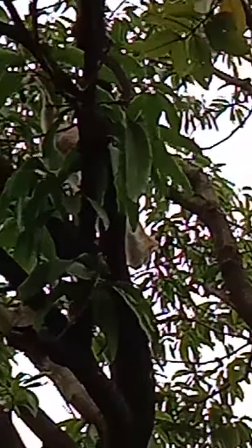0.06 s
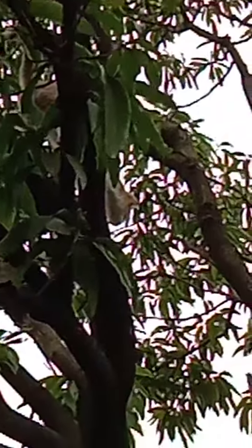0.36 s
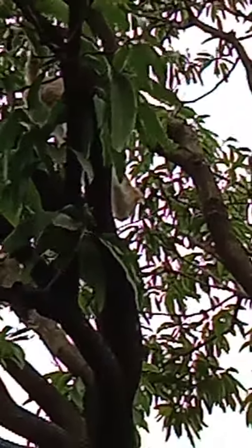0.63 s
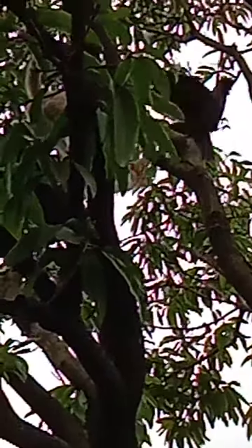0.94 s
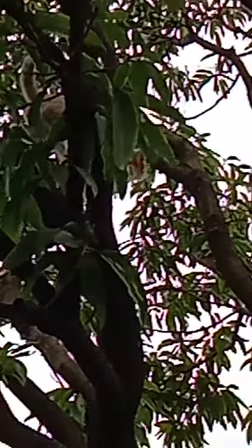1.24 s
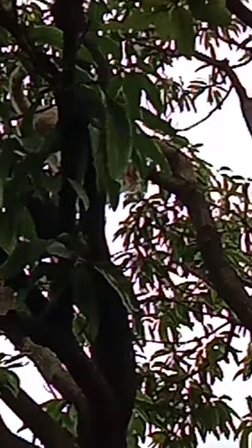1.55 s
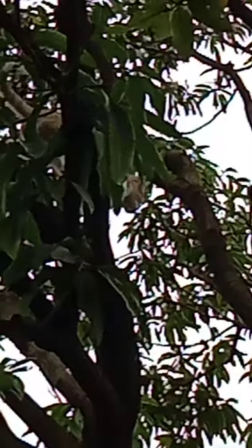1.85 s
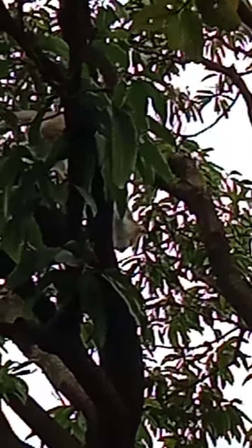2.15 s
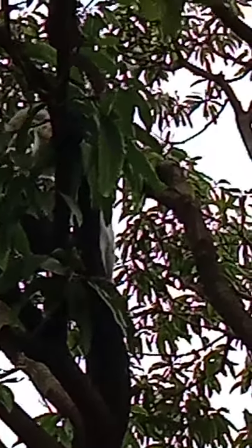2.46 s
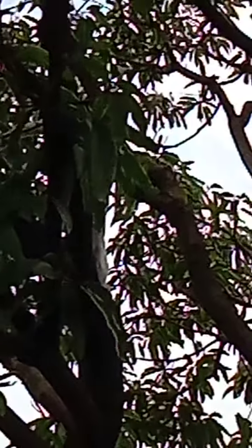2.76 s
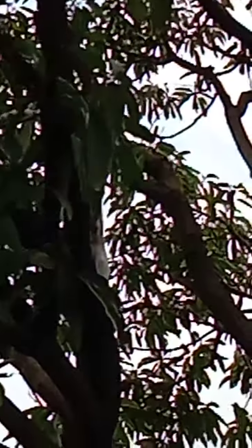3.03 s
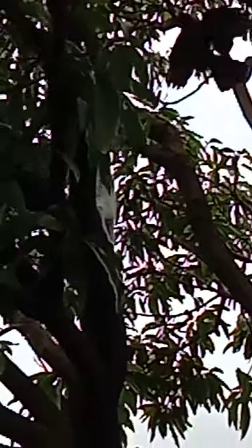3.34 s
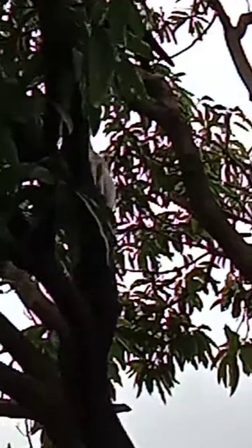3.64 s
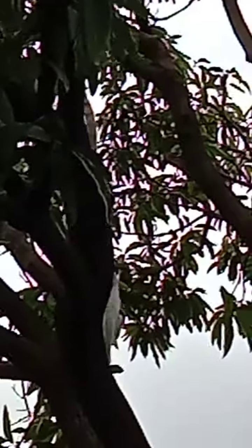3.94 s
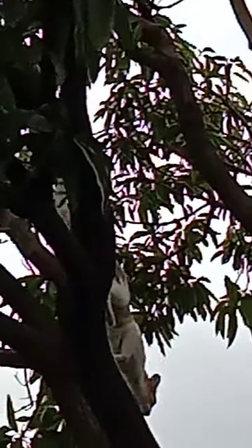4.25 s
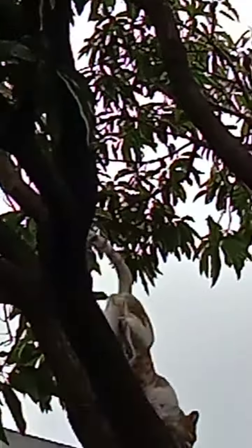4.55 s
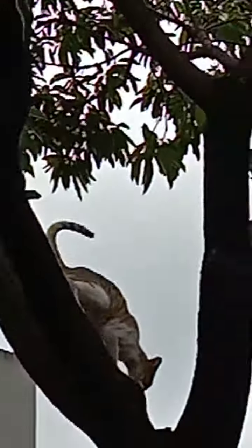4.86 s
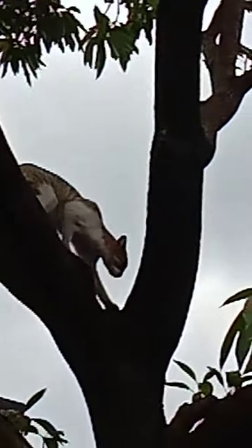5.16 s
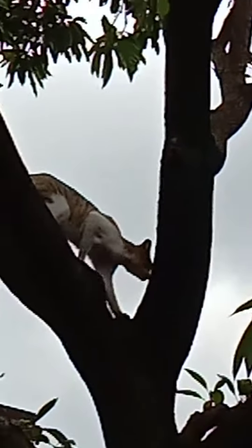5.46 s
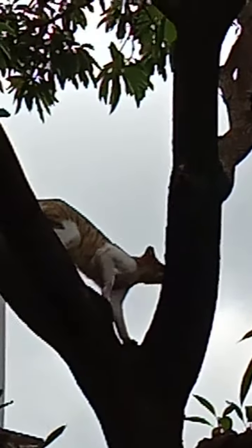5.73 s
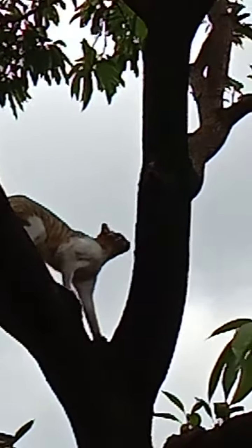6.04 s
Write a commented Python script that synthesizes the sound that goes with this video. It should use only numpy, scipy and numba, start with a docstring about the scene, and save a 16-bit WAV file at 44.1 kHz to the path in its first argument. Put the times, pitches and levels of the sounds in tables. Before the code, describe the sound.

Crows caw harshly outdoors, joined halfway by another crow's rasping screeches, over low rumbles and bumps of microphone handling.

```python
"""Crows scolding a cat

Crows mob a silent cat in a leafy tree: eight harsh caws, joined halfway by another crow's rasping.
Each voice is a train of tiny air pulses from the bird's voice box, shaped by its throat and beak.
Fainter birds call further off, and leaves, trunks and house walls scatter every call.
A hand on the phone rumbles and bumps over soft outdoor air; the sound is mono."""
import sys
import numpy as np
from scipy import signal
from scipy.fft import rfft, irfft, next_fast_len
from scipy.io import wavfile
from scipy.ndimage import uniform_filter1d
from numba import njit

SR = 44100
rng = np.random.default_rng(int(sys.argv[2]) if len(sys.argv) > 2 else 0)


def waveform_to_disk(signal):
    """Save audio, clipped to [-1, 1], as 16-bit WAV at the path in sys.argv[1]."""
    frames = np.transpose(np.atleast_2d(signal))
    scaled = np.clip(frames, -1, 1) * 32767
    samples = np.round(scaled).astype(np.int16)
    wavfile.write(sys.argv[1], SR, samples)


N = 273420
T = np.arange(N) / SR

# Levels in the tables are relative: the functions add their own gains.
# The main caws: start_s, swell_s, fade_s, top_pitch_hz, throat_hz, roughness (0 to 1),
# crow (0 or 1), level_db, open_beak_hz, beak_gain
NEAR_CAWS = [(0.695, 0.41, 0.13, 477.4, 960, 0.48, 0, -21, 2130, 3.2),
             (1.335, 0.28, 0.12, 466.5, 966, 0.43, 0, -19.5, 2004, 2.94),
             (1.915, .14, .16, 489, 986, 0.4, 0, -23.5, 1790, 2.07),
             (3.30, .33, 0.16, 486.7, 893, 0.37, 0, -23, 2030, 3.4),
             (3.73, .15, 0.21, 493.5, 952, 0.41, 0, -24, 2000, 1.3),
             (4.06, .15, .14, 562.7, 1160, 0.23, 1, -20.5, 2270, 4.2),
             (4.55, .13, .155, 530.3, 1064, 0.47, 1, -18, 1890, 1.5),
             (5.10, .15, .15, 499.2, 1020, 0.34, 1, -19, 1830, 3.8)]
# The throat tone of the two cawing crows, one list each: frequency_hz, level_db
CAW_TONES = [
    [(560, -35), (820, -10), (1150, -6), (1500, -1), (2050, -2.5), (2800, -16), (3850, -25.5), (4500, -9.5),
     (5600, -1), (7000, -10.5), (8600, -12.5), (10000, -18), (15500, -22.5)],
    [(600, -28.5), (850, -7.5), (1050, -4.5), (1270, -5), (1550, 0), (2100, 0), (2750, -11), (3500, 5.5),
     (4100, -11.5), (5700, -0.5), (7000, -7.5), (10000, -17.5), (15500, -16)],
]
# The rasping crow's screeches: start_s, swell_s, fade_s, level_db, throat_hz,
# sag (share of throat_hz lost by the end), treble_db, low_db
SCREECHES = [(3.08, 0.07, 0.12, -46, 2860, .05, 6.5, 3), (3.195, 0.38, 0.23, -24.5, 3490, 0.17, 2, 5.5),
             (3.73, 0.28, 0.11, -28, 3240, .1, 4.5, 12), (4.02, 0.15, 0.14, -23.5, 3600, 0.37, 4.5, -3),
             (4.31, 0.19, 0.15, -25, 3530, .25, 4, 4), (4.52, 0.091, .16, -28.5, 3350, 0, 2, 9),
             (4.70, 0.16, .12, -22, 3500, 0.12, 2, 3.5), (4.93, 0.1, 0.088, -23, 3500, 0.26, 2.5, -2),
             (5.16, 0.21, .17, -21.5, 3530, 0.38, -1, 0), (5.53, 0.24, 0.12, -23.5, 3650, 0.46, 1.5, -1),
             (5.829, 0.23, .15, -20, 3570, 0.23, 0, -4.5)]
# The throat tone of the rasping crow: frequency_hz, level_db
SCREECH_TONE = [(600, -40.5), (1200, -24.5), (1700, -14.5), (2150, -12.5), (2600, -5.5), (2950, -6.5),
                (3500, -8.5), (4250, -9.5), (5100, -7.5), (5900, -2), (6800, -12.5), (8200, -11),
                (9200, -18.5), (14500, -22)]
# Hoarse calls from other trees: start_s, length_s, throat_hz, filter_width_hz, level_db
DISTANT_CAWS = [(0.018, 0.22, 2840, 1800, -54.5), (.23, 0.15, 3330, 130, -49), (.33, 0.12, 1510, 320, -43),
                (0.38, 0.2, 3200, 130, -47.5), (0.21, 0.41, 2700, 500, -52), (1.63, 0.21, 3270, 440, -51),
                (2.5, 0.4, 2325, 57, -46.5), (1.4, 0.223, 1800, 1100, -55), (2.48, 0.15, 880, 72, -56),
                (2.48, 0.24, 2750, 530, -45.5), (2.38, 0.37, 1420, 460, -48.5),
                (3.02, 0.233, 1540, 410, -48.5)]
# The path of one far, clear call: time_s, pitch_hz, level_db
CLEAR_CALL = [(2.71, 456, -50), (2.8, 472.6, -44.5), (2.9, 488.6, -51), (3.0, 497.6, -50), (3.08, 483, -45),
              (3.14, 476, -50.5), (3.22, 476, -39)]
# The overtones of that call: pitch_multiple, level_db
CLEAR_OVERTONES = [(2, -4), (3, -18.5), (4, 3), (5, -5), (6, 6), (7, -7)]
# Soft, far hoots: start_s, length_s, top_pitch_hz, level_db
DISTANT_HOOTS = [(0.115, 0.13, 377, -49.5), (1.465, 0.18, 342, -45), (3.564, 0.067, 521, -48.5),
                 (4.056, 0.061, 342, -37), (5.962, 0.043, 335, -38.5)]
# The hand sliding on the case: start_s, swell_s, fade_s, level_db, upper_rumble_db
HAND_RUBS = [(0.0, 0.13, 0.4, -41, -29), (.31, 0.047, 0.1, -24, -17), (.39, 0.38, 0.12, -17.5, -0.5),
             (0.821, 0.091, .11, -18, -4), (1.0, 0.061, 0.24, -29, -20.5), (1.63, 0.22, 0.11, -24.5, -16),
             (1.941, .15, .11, -22.5, -4.5), (2.13, 0.082, 0.21, -33.5, -43),
             (2.371, 0.15, 0.09, -22, -15.5), (2.96, 0.11, 0.093, -32.5, -12),
             (3.12, 0.12, 0.17, -24, -7.5), (3.32, 0.082, 0.15, -34.5, -28)]
# The deep tone of that rubbing: frequency_hz, level_db
RUB_TONE = [(25, -21), (45, -17), (70, 1.5), (120, 7.5), (190, 1.5), (300, -12.5), (450, -25), (700, -47),
            (1200, -55), (2500, -77.5)]
# Fingers landing on the case: start_s, peak_db, pitch_hz, decay_s (time to fall 30 dB)
FINGER_BUMPS = [(0.304, -16.5, 112, 0.023), (.674, -12.5, 418, 0.03), (0.806, -4.5, 171, 0.01),
                (1.386, -32.5, 120, 0.35), (1.785, -19, 113, 0.082), (2.393, -19, 146, 0.2),
                (2.797, -21, 119, 0.18), (3.029, -24.5, 123, 0.07), (3.275, -14.5, 110, .04),
                (3.745, -32.5, 111.9, 0.071), (3.82, -20.5, 127, 0.073), (3.979, -30.5, 84.5, 0.12),
                (4.071, -30, 115, 0.087), (4.136, -29, 96, 0.33), (4.489, -30, 128, 0.056),
                (4.67, -41, 119, .06), (4.992, -23.5, 122, 0.1), (5.058, -24, 120, 0.061),
                (5.58, -28.5, 96, 0.23), (5.809, -29, 116, 0.047), (6.165, -41, 109, 0.095)]
# Outdoor air with a faint insect hiss: frequency_hz, level_db
AIR_TONE = [(25, -10), (60, 11), (150, -6.5), (400, -5), (620, -14), (950, -9), (1900, 0.5), (2900, -7),
            (3900, -30), (4700, -5.5), (5450, 3.5), (6600, -10.5), (9500, -21), (14000, -53)]


def caws(throat_gain=2.28, middle_gain=0.95, middle_hz=1532, fray=1.19):
    """Each caw rises and falls in pitch, is roughest at its ends and brightens with effort."""
    out = np.zeros(N)
    for start, swell_s, fade_s, top_hz, throat_hz, rough, crow, db, beak_hz, beak_gain in NEAR_CAWS:
        span, opening, closing = gesture(start, swell_s, fade_s)
        push = effort(opening, closing, attack=0.97, release=1.0, hold=1.28)
        size = len(push)
        pitch_hz = top_hz * (1 - 0.07 * opening - 0.14 * closing + 0.005 * wander(25, size))
        roughness = rough * (1 + fray * (opening + closing))
        pulses = voice_box(pitch_hz, roughness, rattle_db=2.5, sway=0.141, hiss=0.62)
        voice = colour(pulses, CAW_TONES[crow])
        # The throat rings lower as it closes; the beak rings higher as it opens.
        throat = throat_gain * resonance(voice, throat_hz * (1 - 0.28 * closing), width_hz=150.0)
        middle = middle_gain * resonance(voice, np.full(size, middle_hz), width_hz=173.0)
        beak_bend = 1 - 0.25 * np.sqrt(opening) - 0.18 * closing
        beak = beak_gain * resonance(voice, beak_hz * beak_bend, width_hz=375.0)
        body, treble = split(voice + throat + middle + beak, 2350)
        voice = (body + treble * push ** 0.42) / np.std(body)
        voice = soften_top(voice, 0.64 * push * (1 - opening), power=0.49, above_hz=10800)
        add_with_echo(out, span, voice * push * undb(db + wander(20.7, size)))
    return out


def rasping_crow(pitch_hz=620, roughness=0.78, gain_db=-2, full_force_db=-24):
    """Uneven pulses through a tight throat make strained screeches that dull as they end."""
    out = np.zeros(N)
    for start, swell_s, fade_s, db, top_hz, sag, treble_db, low_db in SCREECHES:
        span, opening, closing = gesture(start, swell_s, fade_s)
        push = effort(opening, closing, attack=0.76, release=0.84)
        size = len(push)
        throat_hz = top_hz * (1 - 0.052 * opening - sag * closing + 0.017 * wander(34.5, size))
        pulses = voice_box(pitch_hz * (1 + 0.04 * wander(18, size)), roughness, rattle_db=-1)
        voice = colour(pulses, SCREECH_TONE)
        # The throat rings at two frequencies that bend together.
        ring = 2.7 * resonance(voice, throat_hz, width_hz=230.0)
        ring += 0.29 * resonance(voice, 1.47 * throat_hz, width_hz=230.0)
        body, treble = split(voice + ring, 3950)
        low, middle = split(body, 1690)
        voice = (middle + low * undb(low_db)) / np.std(middle)
        voice += unit(treble) * undb(treble_db - 3 - 4 * closing)
        force = push * undb(min(db - full_force_db, 0))
        voice = soften_top(voice, force, power=0.66, above_hz=8800)
        add_with_echo(out, span, voice * push * undb(db + gain_db + 0.97 * wander(19.8, size)))
    return out


def voice_box(pitch_hz, roughness, rattle_db=4, sway=0.1362, hiss=1.0, group=6, puff_s=0.0079):
    """Thin skins beat in the breath; the beats swell and bunch in groups, each with a puff of hiss."""
    size = len(pitch_hz)
    cycles = np.cumsum(pitch_hz) / SR
    beats = np.arange(1, int(cycles[-1]))
    pattern = rng.uniform(-1.13, 1, group)[beats % group]
    # Roughness blurs the rattle: chance changes each beat's strength and timing.
    blur = np.interp(beats, cycles, np.minimum(roughness, np.ones(size)))
    chance = rng.uniform(-0.923, 1, (len(beats), 2)) * blur[:, None]
    rattle = 2 * np.pi * beats / group
    strength = undb(rattle_db * np.cos(rattle) + 7 * chance[:, 0])
    shift = sway * np.sin(rattle) + 0.0973 * pattern + 0.1367 * chance[:, 1]
    place = np.interp(beats + shift, cycles, np.arange(size))
    # A beat falls between samples, so spread it over its neighbours.
    near = np.round(place).astype(int)[:, None] + np.arange(-6, 7)
    clicks = strength[:, None] * np.sinc(near - place[:, None])
    pulses = np.bincount(np.clip(near, 0, size - 1).ravel(), clicks.ravel(), size)
    puffs = signal.lfilter([1], [1, -np.exp(-1 / (puff_s * SR))], np.abs(pulses))
    return unit(pulses) + hiss * roughness * unit(puffs * rng.standard_normal(size))


def far_crows(pitch_hz=480):
    """Rough pulses through a ringing throat make faint, hoarse calls that rise and fall."""
    out = np.zeros(N)
    for start, length_s, top_hz, width_hz, db in DISTANT_CAWS:
        span = (T > start) & (T < start + length_s)
        arch = np.sin(np.pi * (T[span] - start) / length_s)
        throat_hz = top_hz * (1 + 0.086 * (arch - 1))
        voice = voice_box(pitch_hz * (1 + 0.079 * (arch - 1)), roughness=0.8)
        for _ in range(2):
            voice = resonance(voice, throat_hz, width_hz)
        out[span] += unit(voice) * arch * undb(db)
    return out


def clear_call(gain_db=-1, ramp_s=0.035):
    """A far bird sings one arching note made of wavering overtones."""
    times, pitches, levels = np.transpose(CLEAR_CALL)
    pitch_hz = np.interp(T, times, pitches) * (1 + 0.0167 * wander(160, N))
    phase = 2 * np.pi * np.cumsum(pitch_hz) / SR
    voice = unit(sum(undb(db) * np.sin(multiple * phase) for multiple, db in CLEAR_OVERTONES))
    level_db = np.interp(T, times, levels) + gain_db + 3 * wander(24.97, N)
    gate = np.clip(np.minimum(T - times[0], times[-1] - T) / ramp_s + 0.5, 0, 1)
    return voice * undb(level_db) * gate


def hoots():
    """Far birds hoot: low, pure tones whose pitch and loudness rise and fall together."""
    out = np.zeros(N)
    for start, length_s, top_hz, db in DISTANT_HOOTS:
        arch = np.sin(np.pi * np.clip((T - start) / length_s, 0, 1))
        pitch_hz = top_hz * (1 + 0.06 * (arch - 1))
        out += undb(db) * arch * unit(np.sin(2 * np.pi * np.cumsum(pitch_hz) / SR))
    return out


def hand_rubs(gain_db=-1.5, patchy_db=4):
    """Skin drags unevenly over the case and sounds brighter when pressed harder."""
    rumble = colour(rng.standard_normal(N), RUB_TONE)
    low, high = map(unit, split(rumble, 244.5))
    drag = undb(patchy_db * np.tanh(wander(44.88, N)))
    out = np.zeros(N)
    for start, swell_s, fade_s, db, upper_db in HAND_RUBS:
        span, opening, closing = gesture(start, swell_s, fade_s)
        press = effort(opening, closing, attack=1.2, release=1.52)
        crest = np.max(unit(press))
        deep, upper = (unit(part[span] * drag[span] * press) / crest for part in (low, high))
        out[span] += (deep + upper * undb(upper_db) * press ** 0.93) * undb(db + gain_db)
    return out


def finger_bumps():
    """Fingers land on the case with dull bumps: bursts of low noise that die away."""
    out = np.zeros(N)
    t = np.arange(SR // 2) / SR
    for start, peak_db, hz, decay_s in FINGER_BUMPS:
        burst = rng.standard_normal(len(t)) * undb(-30 * t / decay_s)
        band = signal.butter(3, [hz * 0.608, hz * 1.39], "band", fs=SR, output="sos")
        bump = signal.sosfilt(band, burst)
        bump *= undb(peak_db) / np.abs(bump).max()
        first = int(start * SR)
        out[first:first + len(t)] += bump[:N - first]
    return out


def surroundings(sound, smear_s=0.0025, low_decay_s=0.46, treble_decay_s=0.42):
    """Leaves smear the sound, branches scatter it, and walls add an echo whose treble dies first."""
    t = np.arange(SR) / SR
    delay_s = smear_s * (1 + np.tanh(wander(150.25, SR // 2 + 1)))  # one delay for each hertz
    leaves = irfft(np.exp(-2j * np.pi * np.cumsum(delay_s)), SR) * (t < 0.1)
    low, high = split(rng.standard_normal(SR), 6600)
    tail = low * undb(-60 * t / low_decay_s) + high * undb(-60 * t / treble_decay_s)
    walls = undb(-1.5) * unit(tail * np.minimum(t / 0.0089, 1))
    branches = undb(-12) * unit(rng.standard_normal(SR) * np.exp(-t / 0.0175))
    return signal.fftconvolve(sound, leaves + (walls + branches) / np.sqrt(SR))[:N]


def air(level_db=-50.5, waver_db=1.5):
    """Soft outdoor noise and a high insect hiss waver separately."""
    parts = split(unit(colour(rng.standard_normal(N), AIR_TONE)), 3900)
    return undb(level_db) * sum(part * undb(waver_db * wander(8, N)) for part in parts)


def gesture(start, swell_s, fade_s):
    """The samples of a call or rub; opening falls from 1 to 0 at the crest, then closing rises to 1."""
    span = (T > start) & (T < start + swell_s + fade_s)
    t = T[span] - start - swell_s
    return span, np.clip(-t / swell_s, 0, 1) ** 2, np.clip(t / fade_s, 0, 1) ** 2


def effort(opening, closing, attack, release, hold=1):
    """An arch from 0 to 1 and back; less attack or release steepens its ends, hold widens its top."""
    return (1 - opening) ** attack * (1 - closing ** hold) ** release


def add_with_echo(out, span, call):
    """Give a call an echo of its own, since the birds keep changing places, and mix it in."""
    heard = surroundings(np.pad(call, (0, SR // 2)))
    first = np.argmax(span)
    out[first:first + len(heard)] += heard[:N - first]


def soften_top(voice, force, power, above_hz):
    """The highest overtones need force: they come last and leave first."""
    body, top = split(voice, above_hz)
    return body + top * force ** power


@njit
def resonance(sound, centre_hz, width_hz):
    """Ring like a hollow space: keep the sound near a frequency that can move."""
    out = np.empty(len(sound))
    band_state, low_state = 0.0, 0.0
    for i in range(len(sound)):
        step = np.tan(np.pi * centre_hz[i] / SR)
        damping = width_hz / centre_hz[i]
        band = (band_state + step * (sound[i] - low_state)) / (1 + step * (step + damping))
        band_state = 2 * band - band_state
        low_state += 2 * step * band
        out[i] = damping * band
    return out


def colour(sound, tone):
    """Shape a sound with a table of frequency_hz, level_db; fade out below its first row."""
    hz, db = np.transpose(tone)
    size = next_fast_len(len(sound) + 2048)
    bins_hz = np.maximum(np.arange(size // 2 + 1) * SR / size, 1)
    gain = undb(np.interp(np.log(bins_hz), np.log(hz), db)) * np.minimum(bins_hz / hz[0], 1) ** 2
    return irfft(rfft(sound, size) * gain, size)[:len(sound)]


def split(sound, hz):
    """The parts below and above a frequency."""
    low = signal.sosfiltfilt(signal.butter(4, hz, fs=SR, output="sos"), sound)
    return low, sound - low


def wander(rate_hz, size):
    """A smooth random drift, typically about 1 away from zero."""
    step = max(int(SR / rate_hz), 1)
    stairs = np.repeat(rng.standard_normal(size // step + 2), step)
    return unit(uniform_filter1d(stairs, step))[:size]


def undb(db):
    """Turn decibels into a gain."""
    return 10 ** (np.asarray(db) / 20)


def unit(sound):
    """Scale to an average strength (rms) of 1."""
    return sound / np.sqrt(np.mean(sound ** 2) + 1e-18)


def scene(caw_db=-3.5, rasp_db=-1, far_db=-2):
    """Mix the birds, the hand and the air, alike in both channels."""
    near = undb(caw_db) * caws() + undb(rasp_db) * rasping_crow()
    far = undb(far_db) * surroundings(far_crows() + clear_call() + hoots())
    mono = near + far + hand_rubs() + finger_bumps() + air()
    return np.array([mono, mono])


def record(dry, top_hz=15600):
    """The phone cuts off the highest treble."""
    return signal.sosfilt(signal.ellip(10, 0.2, 80, top_hz, fs=SR, output="sos"), dry)


dry = scene()
out = record(dry)
waveform_to_disk(out)
```